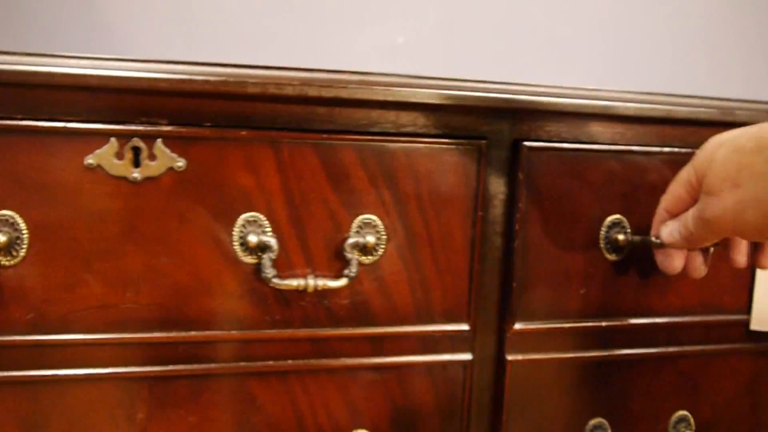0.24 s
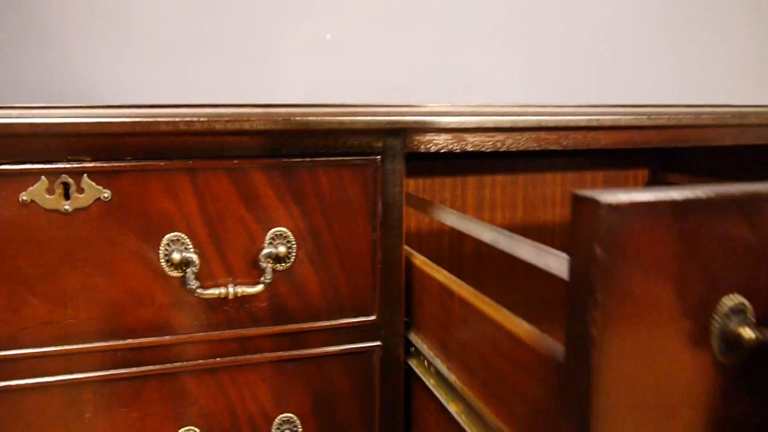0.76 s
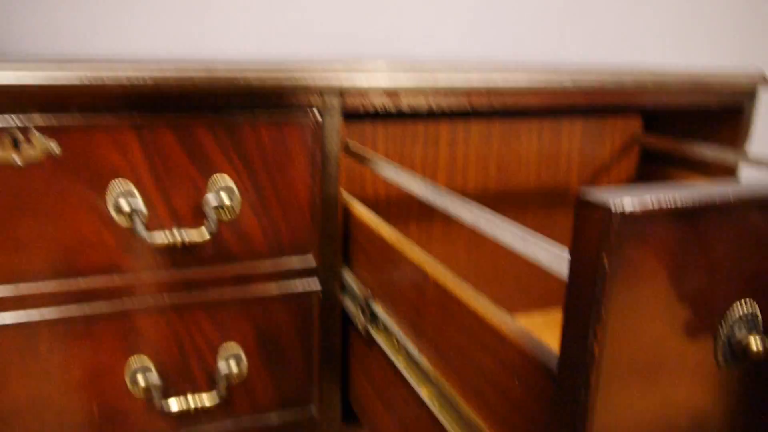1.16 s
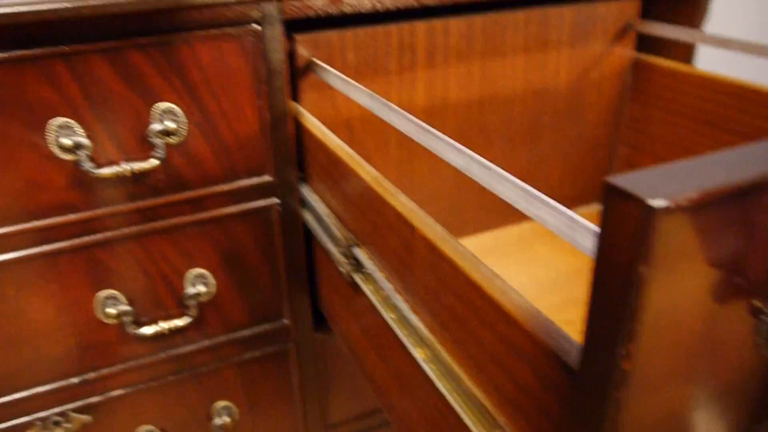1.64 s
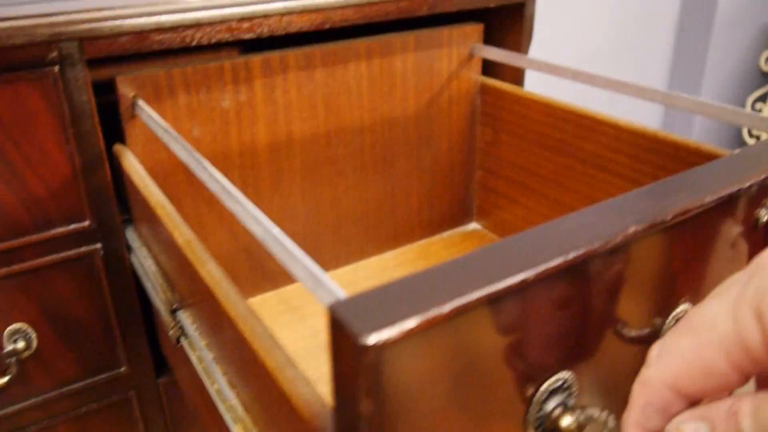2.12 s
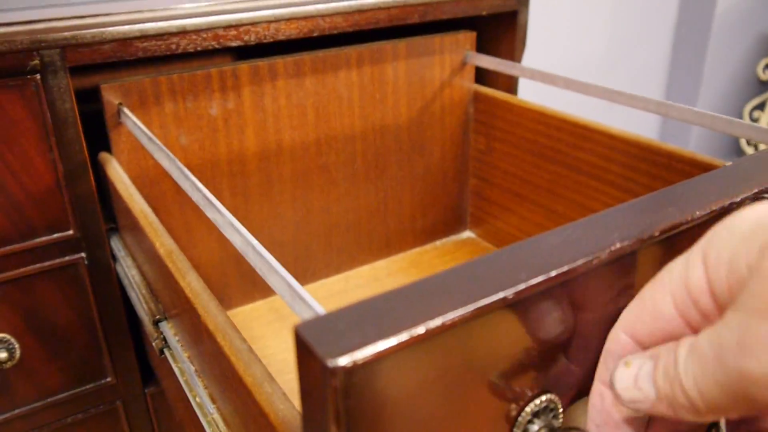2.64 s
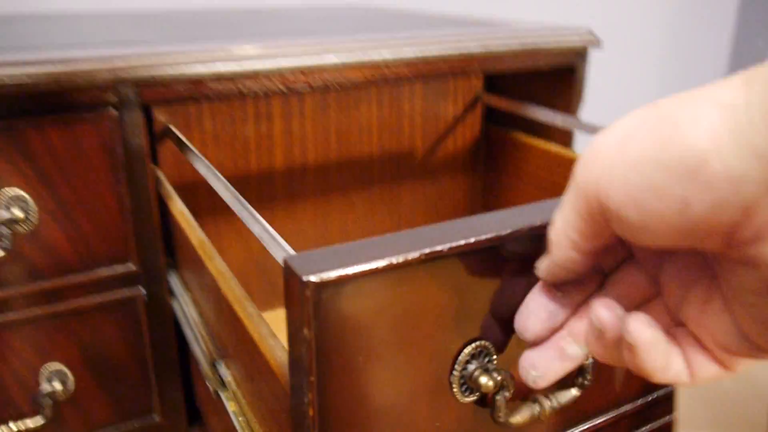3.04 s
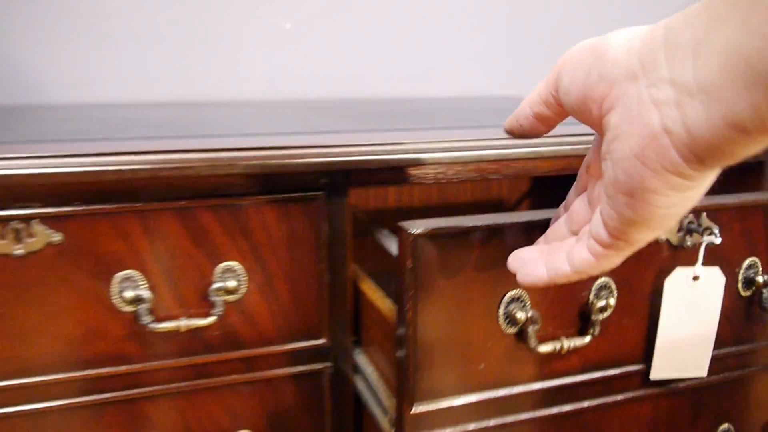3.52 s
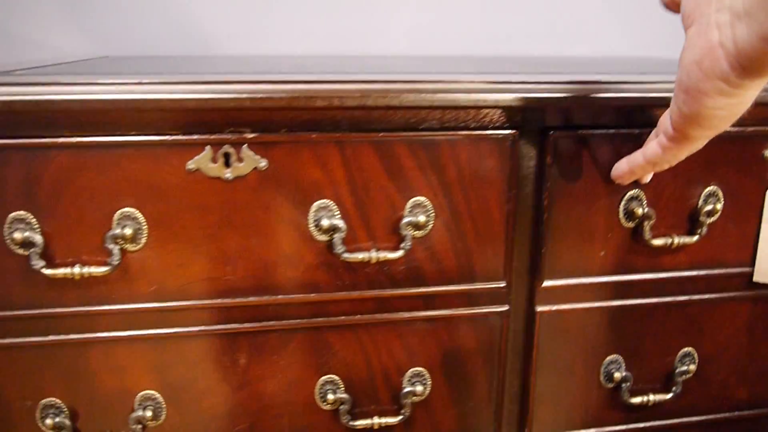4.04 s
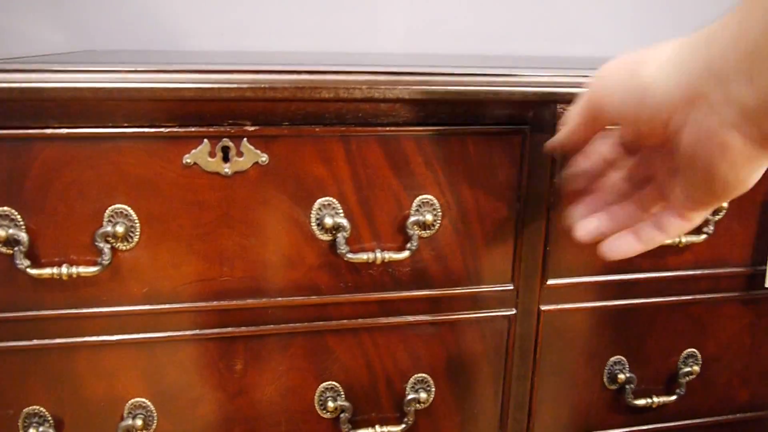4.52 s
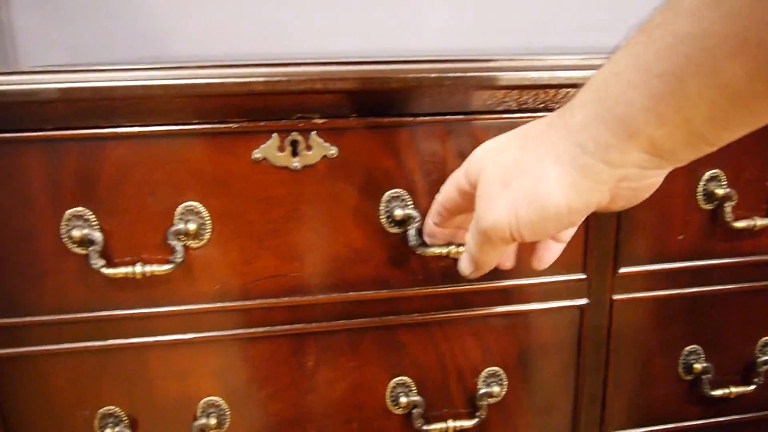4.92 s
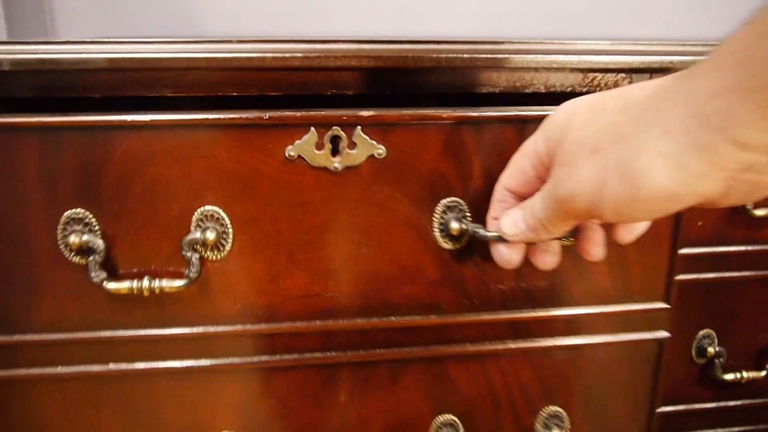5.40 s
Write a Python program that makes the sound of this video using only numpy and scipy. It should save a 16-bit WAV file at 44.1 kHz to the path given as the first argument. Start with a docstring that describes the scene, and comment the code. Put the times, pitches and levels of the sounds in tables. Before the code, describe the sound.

A quiet indoor showroom with faint steady air, heard close to a wooden desk. At about 0.25 s a brass handle clinks with small clacks. Around 0.4 s a drawer breaks loose with a dull thump and short squeak, and a grainy, hollow scrape swells until a loud, boxy bang at 0.93 s, ringing briefly. From 1.0 to 1.8 s it rolls on with a softer low rumble and light clacks, then tiny creaks near 2 s. A quiet pause holds only faint handle ticks at 2.3-2.4 s. At 2.95 s there are creaks and a handle tap, then a strong rumbling push inward, with sharp clacks at 3.2 and 3.65 s. It slides on softly and thuds shut at 4.3 s, a heavy double knock with a low cabinet ring and small rebound. Handle rattles come between 4.7 and 5.3 s; then a second drawer squeaks and scrapes until the end.

```python
"""Wooden desk drawers

A mahogany desk in a showroom, heard from close by. A file drawer on metal runners is pulled, bangs on its
first stop and rolls on out. It is pushed back, clacks through the runner catches and thuds shut.
A brass handle is lifted and a second drawer starts to slide. Grainy noise makes the runners' friction and shakes
the hollow box; shaped noise and dying sine tones make the blows; swelling buzzes make the creaks."""
import sys
import numpy as np
from scipy import signal
from scipy.io import wavfile
from scipy.ndimage import uniform_filter1d, map_coordinates

SR = 44100
rng = np.random.default_rng(int(sys.argv[2]) if len(sys.argv) > 2 else 0)


def master_out(mix):
    """Clip the mix to full scale and print it as 16-bit PCM to the path in sys.argv[1]."""
    frames = np.transpose(np.atleast_2d(mix))
    ceiling = np.clip(frames, -1, 1)
    pcm = np.round(ceiling * 32767).astype(np.int16)
    wavfile.write(sys.argv[1], SR, pcm)


N = 249606
TIME = np.arange(N) / SR
CENTRES = 31.25 * 2 ** (np.arange(28) / 3)  # third-octave band centres, Hz

# Drawer strokes: each gathers speed to its top, slows, then coasts to rest. Layer levels are relative, at top speed.
# [start t/s, top t/s, end t/s, start speed/dB, end speed/dB, coasting time/s,
#  frame shudder/dB, box rumble/dB, panel scrape/dB, runner hiss/dB]
STROKES = [ (0.41, 0.65, 0.93, -17, -4, .05, -24, -33.5, -25.8, -46.3),
           (1.02, 1.15, 1.82, -1, -10, .13, -31, -32.5, -42.5, -62),
           (2.99, 3.17, 3.53, -8, -1, .14, -38, -26.3, -33.7, -48),
           (3.68, 3.74, 4.29, -1, -5, .05, -40, -37.5, -38.5, -65),
           (5.32, 5.52, 5.66, -8, 0, .05, -33, -33, -32.5, -52)]
STROKE_ATTACK_S = .008  # time constant of the fade-in leading up to the start
BOX_FOLLOWS, SCRAPE_FOLLOWS, HISS_FOLLOWS = .55, 1.0, .95  # dB of each layer per dB of speed
# How far the drawer stands out of the cabinet [t/s, share 0-1]
OPENING = [(0.4, 0.05), (0.6, .5), (0.9, 1), (3.0, 1), (3.5, 0.85), (3.75, .4), (4.0, .12), (4.3, 0.02)]
# Friction colour [f/Hz, relative level/dB per Hz]
FRICTION_COLOUR = [(30, -20), (70, -17), (140, -11), (240, -5), (340, -6.5), (500, -7.5), (780, -8),
                   (1100, -21), (1550, -24.5), (2200, -29.5), (3600, -38.7), (9700, -39.5), (12000, -42.5),
                   (15500, -63)]
# Resonances of panels and runners [f/Hz, width/Hz, gain/dB]
SLIDE_PEAKS = [(420, 41, 1.5), (1180, 80, 6), (1660, 120, 3), (2400, 60, 3)]
# Resonances of the drawer box, strongest when it is out [f when fully out/Hz, width/Hz, full gain/dB]
BOX_PEAKS = [(190, 30, 13), (234, 26, 8)]
SHUT_PITCH_RISE = .33  # share by which they rise as the cabinet closes round the box

# The drawer hits a stop or a runner catch, or rebounds from it
# [t/s, rise/s, first decay t60/s, relative level/dB, extra bass/dB, extra treble/dB,
#  box ring/dB, cabinet ring/dB, steel ring/dB]
STOPS = [ (0.9335, .0016, .12, -18, -2, 1, -1, -19, -47), (0.9583, .003, .1, -32, 0, -8, -6, -50, -62),
         (3.21, .002, .07, -21, -17, -3.5, -17, -48, -44), (3.243, .003, .07, -38, -12, -8, -21, -50, -56),
         (3.645, .010, .19, -26.3, 0, 6, -38, -40, -52), (4.3085, .003, .12, -21.5, 2, -3, -22, -13, -48),
         (4.317, .0012, .13, -21, 8.5, -9, -22, -6, -52), (4.378, .004, .12, -36, 6, -14, -28, -19, -60)]
# Light clacks and brushes of the hand, drawer fronts and runners
# [t/s, rise/s, first decay t60/s, relative level/dB, extra bass/dB, extra treble/dB]
CLACKS = [(0.232, .004, .1, -57, -6, 2), (0.248, .0015, .16, -33, -1, -10),
          (0.298, .001, .2, -41.5, -10, -1), (0.595, .035, .2, -43, -8, 4.5),
          (1.164, .001, .05, -33, -12, -7), (1.243, .002, .06, -45, -8, -4),
          (2.959, .006, .2, -48.5, -2, -3), (3.118, .004, .07, -37, -12, -9),
          (3.199, .002, .05, -37, -20, 4), (3.638, .005, .06, -45, -8, 5), (4.568, .002, .12, -63, 4, 9),
          (4.708, .002, .4, -51, -3, -6), (5.004, .002, .18, -58, 3, -4), (5.154, .006, .5, -51, -4, -3)]
# Dull thumps as a drawer breaks loose or seats itself [t/s, relative level/dB]
THUMPS = [(0.394, -48), (4.232, -43), (5.316, -42)]
THUMP_RISE_S, THUMP_T60_S, THUMP_BASS_DB, THUMP_TREBLE_DB = .012, .18, 15, -12
# Colour shared by all blows [f/Hz, relative level/dB per third octave]
BLOW_COLOUR = [(30, -33), (70, -15), (180, -.5), (450, 0), (680, -4.2), (1300, -6.8), (3500, -8.5),
               (9000, -10)]
# Change to the top treble of a blow [f/Hz, gain/dB]
BLOW_TOP = [(9000, 0), (11500, 1), (14500, -15)]
# Where a heavy blow adds bass [f/Hz, share of the extra bass]
BASS_SHELF = [(130, 1), (450, 0)]
# Where a hard blow adds treble [f/Hz, share of the extra treble]
TREBLE_SHELF = [(450, 0), (2500, .9), (9000, 1.15), (15000, 1.7)]
# How long the showroom rings on [f/Hz, t60/s]
ROOM_T60 = [(70, 0.93), (250, .5), (1000, 0.53), (3500, 0.4969), (8000, 0.53), (15000, 0.03)]
# How loud the room is at the blow [f/Hz, level against the blow/dB]
ROOM_DB = [(70, -19), (250, -9), (1000, -11), (4000, -14.5), (15000, -10.5)]

# Ringing tones of the drawer box [f/Hz, relative level/dB, t60/s]
BOX_MODES = [(197.7, -0.5, 0.3), (167, -17, .25), (252, -15, .3), (423, -10, .12), (459, -8.5, 0.26),
             (590, -13, .1)]
# Ringing tones of the cabinet [f/Hz, relative level/dB, t60/s]
CABINET_MODES = [(70.5, -14.5, .42), (113, -12.5, .42), (142, 6, 0.068), (163.5, -4, 0.34),
                 (180, -5.5, 0.36), (212, -11, .3), (285, -11, 0.27), (320, -11, .3), (335, -10, 0.36),
                 (409, -5.5, 0.27), (444, -10, .25), (745, -19, 0.3), (790, -18, 0.21)]
# Ringing tones of the steel runner [f/Hz, relative level/dB, t60/s]
RUNNER_MODES = [(1190, 4, 0.4), (1593, -1, 0.55), (2420, -3, 0.45)]
# Ringing tone of its small catch [f/Hz, relative level/dB, t60/s]
CATCH_MODES = [(11550, 1.5, 0.2)]
RING_LAG_S = .004  # the parts take up the blow a moment later

# Parts that catch and judder
# [t/s, glide length/s, starting f/Hz, final f/Hz, width/Hz, relative level/dB]
CREAKS = [ (0.416, .05, 1408, 2250, 400, -47), (1.163, .035, 1230, 1190, 80, -44),
          (1.847, .047, 1092, 994, 470, -55), (1.979, .047, 993, 885, 430, -56),
          (2.08, .047, 1017, 886, 400, -58), (2.952, .025, 690, 720, 25, -37),
          (3.108, .04, 760, 690, 40, -32), (4.152, .035, 1850, 1660, 160, -51),
          (4.165, .035, 1450, 1380, 60, -45.5), (4.395, .07, 750, 730, 25, -38),
          (5.322, .045, 1470, 1680, 150, -43), (5.350, .04, 1720, 1580, 150, -44.5)]
OVERTONE_DB = -16  # their second harmonic, against the first

# The brass handle chatters on its pivots [t/s, relative level/dB, brightness/dB per octave]
HANDLE_TAPS = [(0.249, -38, 0), (0.299, -42, 0), (2.282, -53, -9), (2.408, -63, -2), (2.96, -44, 0),
               (4.709, -44, -3), (4.798, -57, 0), (4.879, -55, -4), (5.008, -47, 3), (5.134, -55, 2),
               (5.159, -43.5, 0), (5.274, -54, 0)]
# Ringing tones of the handle on the drawer front [average f/Hz, relative level/dB, t60/s]
HANDLE_MODES = [(780, -5, .06), (930, -1, .06), (1110, -1, .11), (1420, -3, .06), (1700, -6, .06),
                (2330, -7, .11)]
HANDLE_MIDDLE_HZ = 1400  # a gripped tap favours the tones below this, a free one those above
BOUNCE_S, BOUNCE_LOSS_DB = .007, 4  # average gap between bounces, and average loss at each
GRIP_DETUNE = .025  # typical share by which the fingers shift the tones from tap to tap

# Background air colour [f/Hz, relative level/dB per Hz]
AIR_COLOUR = [(30, -15), (65, -9), (130, -2), (400, -2.5), (800, -9), (1600, -19.5), (3200, -26.5),
              (5000, -25), (10000, -25.5), (15000, -31)]
AIR_DB = -56.3
# How alike left and right are [f/Hz, likeness, 1 = identical]
LIKENESS = [(30, .95), (60, .993), (125, .9999), (280, .9993), (500, .987), (1000, .82), (2000, .72),
            (4500, .79), (9000, .8), (12500, -.25)]
# Balance of the two sides [f/Hz, left minus right/dB]
LEAN = [(500, 0), (2000, -1.4), (5000, -1.5), (12000, -.6)]
CUTOFF_HZ = 15900


def slides(grain_share=0.38, hiss_db=2.8, gather_s=0.036, patchy_db=1.9, drag_db=0.6):
    """Runner friction, part separate contacts and part smooth rub, coloured by the drawer's panels."""
    share = np.clip(grain_share, 0, 1)
    contacts = np.sqrt(share) * grains(N, per_s=1100, spread_db=0.3)
    rubs = np.sqrt(1 - share) * rng.standard_normal((2, 2, N))
    friction = np.zeros((2, N))
    for k, hz in enumerate(CENTRES):
        # the moving contact point feeds now one group of modes, now another
        level_db = at_hz(FRICTION_COLOUR, hz) + patchy_db * wobble(per_s=22)
        source = contacts * (-1) ** k + rubs[k % 2]
        # the root of the frequency turns a level per Hz into a level per band
        friction += third_octave(source, hz) * np.sqrt(hz) * from_db(level_db)
    for hz, width, db in SLIDE_PEAKS:
        friction = friction + (from_db(db) - 1) * resonance(friction, hz, width)
    opening = np.clip(np.interp(TIME, *np.transpose(OPENING)), 0, 1)
    for hz, width, db in BOX_PEAKS:
        moving_hz = hz * (1 + SHUT_PITCH_RISE * (1 - opening))
        boom = moving_resonance(friction, moving_hz, width)
        friction = friction + np.sqrt(opening) * (from_db(db) - 1) * boom

    # running loudness of three registers, used to even out the layers
    mono = friction.mean(axis=0)
    bass, middle, treble = [np.sqrt(uniform_filter1d(band(mono, low, high) ** 2, size=4000))
                            for low, high in [(100, 300), (300, 1500), (2000, 4600)]]
    # the frame and box carry the bass, the panels the middle, the bare steel the treble
    frame, rest = split(friction, 125)
    box, rest = split(rest, 300)
    panel, rest = split(rest, 1700)
    steel, sizzle = split(rest, 6000)

    *_, frame_db, box_db, panel_db, steel_db = np.transpose(STROKES)
    rumble = (frame * travel(frame_db, BOX_FOLLOWS) + box * travel(box_db, BOX_FOLLOWS)) / bass
    scrape = panel * travel(panel_db, SCRAPE_FOLLOWS) / middle
    speed = travel(steel_db, HISS_FOLLOWS)
    # the top of the hiss builds up late, as the drawer gathers speed
    keep = np.exp(-1 / (gather_s * SR))
    gathered = np.minimum(signal.lfilter([1 - keep], [1, -keep], speed), speed)
    hiss = (steel * speed + sizzle * gathered) / treble
    # the drawer drags unevenly as it rocks on its runners
    drag = from_db(drag_db * wobble(per_s=40))
    return (rumble + scrape) * drag + from_db(hiss_db) * hiss


def grains(size, per_s, spread_db):
    """Tiny contacts of uneven strength, at the same random moments in two channels."""
    born = rng.random(size) < per_s / SR
    strength = from_db(spread_db * np.minimum(rng.exponential(1, size), 4))
    return rms_scaled(born * strength * rng.standard_normal((2, size)))


def travel(levels_db, follows):
    """Gain of one friction layer: it follows the speed of each stroke."""
    gain = np.zeros(N)
    for (start, top, end, start_db, end_db, coast, *_), level_db in zip(STROKES, levels_db):
        speed_db = np.interp(TIME, [start, top, end], [start_db, 0, end_db])
        before = np.maximum(start - TIME, 0) / STROKE_ATTACK_S
        after = np.maximum(TIME - end, 0) / coast
        gain += from_db(level_db + follows * speed_db) * np.exp(-before - after)
    return gain


def knocks():
    """The drawer hitting its stops, light clacks and dull thumps, each a burst of coloured noise."""
    out = np.zeros((2, N))
    for s, rise, t60, db, bass_db, treble_db, *_ in STOPS:
        add(out, s, blow(rise, t60, db, bass_db, treble_db))
    for s, rise, t60, db, bass_db, treble_db in CLACKS:
        add(out, s, blow(rise, t60, db, bass_db, treble_db))
    for s, db in THUMPS:
        add(out, s, blow(THUMP_RISE_S, THUMP_T60_S, db, THUMP_BASS_DB, THUMP_TREBLE_DB))
    return out


def blow(rise, t60, db, bass_db, treble_db):
    """Parts chatter together for a moment; dense wood modes die quickly and the room rings on."""
    t = np.arange(SR) / SR
    after = np.maximum(t - rise, 0)
    attack = np.minimum(t / max(rise, 1e-4), 1)
    white = rng.standard_normal((2, 2, SR))
    chatter = grains(SR, per_s=900, spread_db=6.5) * np.exp(-t / 0.012)
    out = np.zeros((2, SR))
    for k, hz in enumerate(CENTRES):
        wood = from_db(-60 * after / t60)
        room = from_db(at_hz(ROOM_DB, hz) - 60 * after / at_hz(ROOM_T60, hz))
        shape = attack * np.hypot(wood, room)
        ringing = third_octave(white[k % 2] + 1.13 * chatter, hz) * shape
        colour_db = at_hz(BLOW_COLOUR, hz) + at_hz(BLOW_TOP, hz)
        colour_db += bass_db * at_hz(BASS_SHELF, hz) + treble_db * at_hz(TREBLE_SHELF, hz)
        out += rms_scaled(ringing) * rms(shape) * from_db(db + colour_db)
    return out


def ringing_parts(build_s=0.0035):
    """Stops ring the drawer box, the cabinet and the steel runner with its catch as dying sine tones."""
    out, t = np.zeros(N), np.arange(SR) / SR

    def ring(modes):
        """Sum of a part's dying tones, with a soft start."""
        tones = sum(from_db(db - 60 * t / t60) * np.sin(2 * np.pi * hz * t) for hz, db, t60 in modes)
        return tones * (1 - np.exp(-t / build_s))

    box, cabinet, steel = ring(BOX_MODES), ring(CABINET_MODES), ring(RUNNER_MODES + CATCH_MODES)
    for s, *_, box_db, cabinet_db, steel_db in STOPS:
        parts = from_db(box_db) * box + from_db(cabinet_db) * cabinet + from_db(steel_db) * steel
        add(out, s + RING_LAG_S, parts)
    return out


def creaks():
    """Stick and slip repeats at a gliding rate, uneven in strength and timing, then fades."""
    out, t = np.zeros(N), np.arange(SR // 5) / SR
    for s, length, from_hz, to_hz, width, db in CREAKS:
        swell = 3 * t / length * np.exp(1 - 3 * t / length)  # loudest a third of the way in
        hold = np.exp(-np.pi * width / SR)
        # slow random changes blur each tone to the given width
        uneven = signal.lfilter([1], [1, -hold], rng.standard_normal((2, 2, len(t))))
        rate_hz = np.interp(t, [0, length], [from_hz, to_hz])
        phase = 2 * np.pi * np.cumsum(rate_hz) / SR
        first = uneven[0, 0] * np.sin(phase) + uneven[0, 1] * np.cos(phase)
        second = uneven[1, 0] * np.sin(2 * phase) + uneven[1, 1] * np.cos(2 * phase)
        rasp = (first + from_db(OVERTONE_DB) * second) * swell
        add(out, s, from_db(db) * rms_scaled(rasp) * rms(swell))
    return out


def handle(uneven_db=3, count=4):
    """Each tap is a quick dying run of bounces; each strikes every mode with a strength of its own."""
    out, t = np.zeros(N), np.arange(SR // 4) / SR
    for tap_s, db, bright_db in HANDLE_TAPS:
        modes = []
        for hz, mode_db, t60 in HANDLE_MODES:
            tilt_db = bright_db * np.log2(hz / HANDLE_MIDDLE_HZ)
            tap_hz = hz * (1 + GRIP_DETUNE * rng.standard_normal())
            modes.append(from_db(mode_db + tilt_db - 60 * t / t60) * np.sin(2 * np.pi * tap_hz * t))
        bounce_s = tap_s
        for bounce in range(count):
            strength_db = db - BOUNCE_LOSS_DB * bounce + uneven_db * rng.standard_normal(len(modes))
            strengths = from_db(strength_db) * rng.choice([-1, 1], len(modes))
            add(out, bounce_s, strengths @ np.array(modes) / np.sqrt(len(modes)))
            bounce_s += BOUNCE_S * (.5 + rng.random())
    return out


def panels(x):
    """Crowded panel modes and nearby surfaces give the middle and treble an uneven, hollow colour."""
    t, echo_db, t60 = np.arange(8192) / SR, -8.0, .16
    response = band(rng.standard_normal(len(t)), 900, 15000) * from_db(-60 * t / t60)
    response = response / np.linalg.norm(response) * from_db(echo_db)
    return x + signal.fftconvolve(x, response[None])[:, :N]


def air():
    """Faint steady ventilation and hiss, as coloured stereo noise."""
    white = rng.standard_normal((2, 2, N))
    noise = np.zeros((2, N))
    for k, hz in enumerate(CENTRES):
        noise += third_octave(white[k % 2], hz) * np.sqrt(hz) * from_db(at_hz(AIR_COLOUR, hz))
    return from_db(AIR_DB) * rms_scaled(noise)


def third_octave(pair, hz):
    """One band of two signals, mixed into left and right; rms 1."""
    half = 2 ** (1 / 6)
    mid, side = band(pair, hz / half, hz * half)
    alike = np.clip(at_hz(LIKENESS, hz), -1, 1)
    sides = np.array([[1], [-1]])  # left, right
    stereo = np.sqrt(1 + alike) * mid + np.sqrt(1 - alike) * side * sides
    return rms_scaled(stereo * from_db(sides * at_hz(LEAN, hz) / 2))


def resonance(x, hz, width):
    """Two-pole resonance with gain 1 on top."""
    r = np.exp(-np.pi * width / SR)
    feed = np.array([1, 0, -1]) * (1 - r * r) / 2
    return signal.lfilter(feed, [1, -2 * r * np.cos(2 * np.pi * hz / SR), r * r], x)


def moving_resonance(x, hz, width):
    """Resonance whose centre follows a curve; gain 1 on top."""
    turn = np.exp(2j * np.pi * np.cumsum(hz) / SR)
    r = np.exp(-np.pi * width / SR)
    # shift the centre down to 0 Hz, smooth there, and shift back up
    return 2 * np.real(turn * signal.lfilter([1 - r], [1, -r], x / turn))


def band(x, low, high):
    """Band-pass filter."""
    return signal.sosfilt(signal.butter(2, [low, high], "band", fs=SR, output="sos"), x)


def split(x, hz):
    """Gentle crossover: the parts below and above a frequency."""
    below = signal.sosfiltfilt(signal.butter(2, hz, fs=SR, output="sos"), x)
    return below, x - below


def wobble(per_s):
    """Smooth random change with rms 1, from random points joined by a curve."""
    knots = rng.standard_normal(1000)
    # worked out at every 50th sample, then held
    curve = map_coordinates(knots, [TIME[::50] * per_s], order=3, mode="wrap")
    return rms_scaled(curve).repeat(50)[:N]


def at_hz(points, hz):
    """Read a table on a log-frequency axis."""
    table_hz, values = np.transpose(points)
    return np.interp(np.log(hz), np.log(table_hz), values)


def from_db(db):
    """Decibels to gain."""
    return 10 ** (np.asarray(db) / 20)


def rms(x):
    """Root mean square: the average strength of a signal."""
    return np.sqrt(np.mean(x ** 2) + 1e-20)


def rms_scaled(x):
    """The same signal at rms 1."""
    return x / rms(x)


def add(out, s, sound):
    """Mix a sound in from a given time in seconds."""
    start = round(s * SR)
    out[..., start:start + sound.shape[-1]] += sound[..., :N - start]


def scene():
    """The desk in the quiet showroom."""
    desk = slides() + knocks() + creaks() + handle()
    return panels(desk) + ringing_parts() + air()


def record(dry, low_cut_hz=61.0):
    """The small microphone loses the deepest bass, the loudest peaks are rounded and the top is cut."""
    dry = signal.sosfilt(signal.butter(2, low_cut_hz, "high", fs=SR, output="sos"), dry)
    rounded = dry / (1 + dry ** 8) ** (1 / 8)
    return signal.sosfilt(signal.ellip(10, .2, 80, CUTOFF_HZ, fs=SR, output="sos"), rounded)


dry = scene()
out = record(dry)
master_out(out)
```